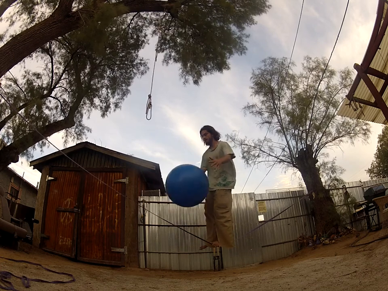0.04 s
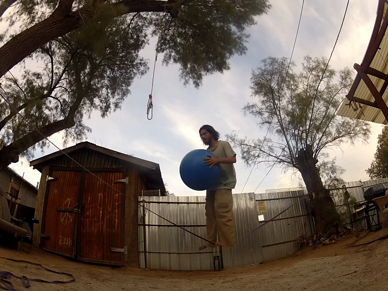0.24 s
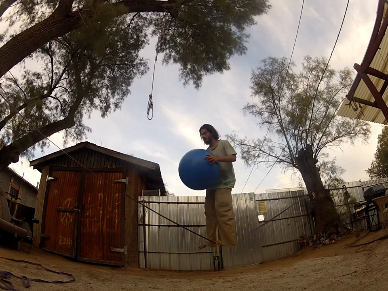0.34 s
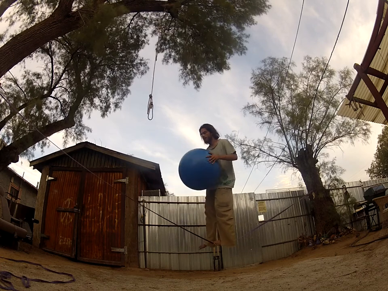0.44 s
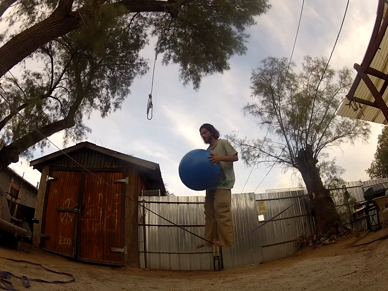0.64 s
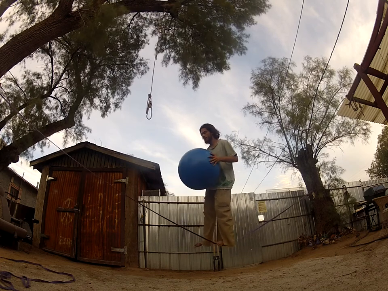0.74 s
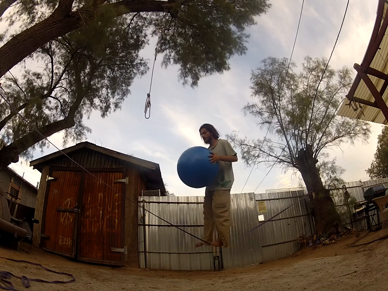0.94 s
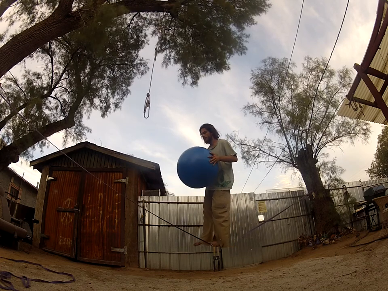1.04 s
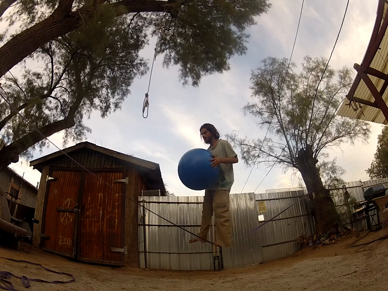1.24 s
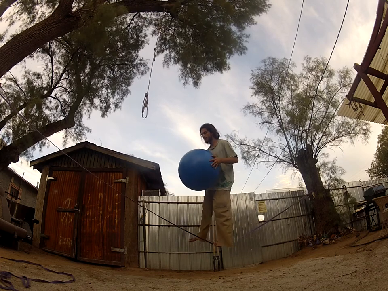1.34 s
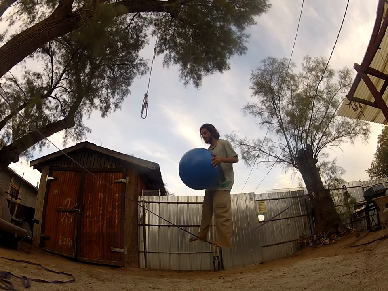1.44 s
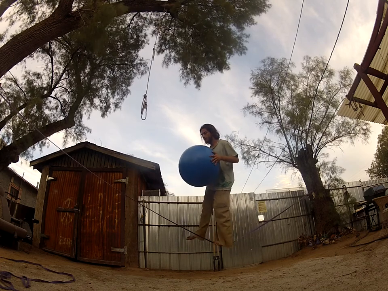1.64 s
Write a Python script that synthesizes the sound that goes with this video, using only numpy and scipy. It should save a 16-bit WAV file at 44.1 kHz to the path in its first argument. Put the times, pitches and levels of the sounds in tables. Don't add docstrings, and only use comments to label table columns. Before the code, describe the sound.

A large air-filled rubber ball is caught once. Faint wind rumble and a low puff of moving air open the scene; at about 0.21 s the palms hit with a deep, hollow thud, and finger slaps rattle within 0.02 s. The rubbery ring is muted by the grip near 0.28 s, diffuse yard reflections fade by about 0.8 s, and quiet wind buffeting continues on a coarse, cased microphone.

```python
import sys
import numpy as np
from scipy import signal
from scipy.fft import rfft, irfft
from scipy.io import wavfile
from scipy.ndimage import uniform_filter1d

SR = 44100
rng = np.random.default_rng(int(sys.argv[2]) if len(sys.argv) > 2 else 0)


def pcm_store(signal):
    levels = np.round(np.clip(np.atleast_2d(signal), -1, 1) * 32767)
    wavfile.write(sys.argv[1], SR, levels.astype(np.int16).T)


def volts_from_decibels(level):
    exponent = np.asarray(level, float) / 20
    return 10 ** exponent


N = 74970

# [f/Hz, density/dB]
SLAP_TINT = [(500, -33), (900, 5), (1400, 9), (2050, 9), (3500, 3), (5600, -7)]


def ball():
    # [t/s, level/dB, contact/s]
    palms = [
        (.2116, 0, .0016),
        (.2228, -15, .0016),
    ]
    # [f/Hz, level/dB, t60/s]
    ball_modes = [(134.7, -20, .6), (130, -4.5, .044), (198, -9.3, .072), (476, -28, .34),
                  (669, -9.3, .036), (730.5, -13, .14),
                  (66.4, -25.5, 0.69), (248, -37.5, 0.82), (297.6, -33.5, 1)]
    radiate_hz, grip_s, grip_t60_s = 167, .283, .13
    t = np.arange(N) / SR
    push = np.zeros(N)
    for start_s, level_db, contact_s in palms:
        pulse = np.sin(np.pi * np.clip((t - start_s) / contact_s, 0, 1))
        push += volts_from_decibels(level_db) * pulse * np.pi / (2 * contact_s * SR)
    ring = strike(ball_modes, push)
    radiated = signal.sosfilt(signal.butter(2, radiate_hz, "high", fs=SR, output="sos"), ring)
    return radiated * np.where(t < grip_s, 1, fade(grip_s, grip_t60_s))


def slaps():
    # [t/s, crack/dB, crack t60/s, snap/dB]
    fingers = [
        (.2115, -36, .02, -30),
        (.2138, -36, .03, -32),
        (.2195, -43, .05, -50),
        (.2262, -35, .007, -19),
        (.229, -40, .025, -40),
    ]
    # [f/Hz, level/dB, t60/s]
    skin_modes = [(860, 13, .03), (958, -6, .25), (1206, -12, .2), (1500, -2, .04), (1637, -12, .2),
                  (1862, -8, .15), (2063, 0, .17), (2141, -7, .15), (2300, -13, .25), (2793, -17, .3),
                  (2935, -11, .15), (3520, -14, .1)]
    skin_db = -40
    ticks, first, crack_level = np.zeros((3, N))
    for start_s, crack_db, crack_t60_s, snap_db in fingers:
        ticks[int(start_s * SR)] = volts_from_decibels(snap_db)
        crack_level += volts_from_decibels(crack_db) * fade(start_s, crack_t60_s)
    first[int(fingers[0][0] * SR)] = volts_from_decibels(skin_db)
    snaps = strike([(3020, 0, .0011)], ticks)
    cracks = tinted(SLAP_TINT) * crack_level
    return snaps + cracks + strike(skin_modes, first)


def rush():
    # [t/s, level/dB]
    course = np.array([(0, -51), (.022, -39), (0.044, -42), (.075, -45.5), (.12, -56), (0.156, -59),
                       (.18, -35), (0.203, -36), (.225, -78)])
    # [f/Hz, density/dB]
    rush_tint = [(24, -34), (40, -0.5), (215, 1.5), (296, -9.5), (383, -17), (735, -19.5), (843, -23.5),
                 (1500, -36), (1950, -51), (3300, -120)]
    level_db = np.interp(np.arange(N) / SR, course[:, 0], course[:, 1])
    return tinted(rush_tint) * volts_from_decibels(level_db)


def yard():
    # [f/Hz, density/dB]
    thud_tint = [(40, -28), (70, -19), (150, 3.5), (290, -2.5), (390, -16), (480, -18.5), (750, -16.5),
                 (1100, -42)]
    # [f/Hz, density/dB]
    wash_tint = [(710, -21), (1200, 4), (2210, 2.5), (2570, -5), (2810, 1), (5600, -24), (7280, -56),
                 (12300, -120)]
    start_s, rise_s = .2003, .032
    thud_db, thud_t60_s = -27, .44
    crisp_db, crisp_t60_s = -42, .18
    late_db, late_t60_s = -50, .84
    rise = np.clip((np.arange(N) / SR - start_s) / rise_s, 0, 1)
    thud = tinted(thud_tint) * volts_from_decibels(thud_db) * fade(start_s, thud_t60_s)
    crisp = tinted(SLAP_TINT) * volts_from_decibels(crisp_db) * fade(start_s, crisp_t60_s)
    late = tinted(wash_tint) * volts_from_decibels(late_db) * fade(start_s, late_t60_s)
    return rise * (thud + crisp + late)


def wind():
    # [f/Hz, density/dB]
    wind_tint = [(15, -18), (25, -44), (44, -2), (146, -1), (225, -7), (667, -15), (895, -23),
                 (1170, -25.5), (5600, -45), (7280, -46), (12300, -120)]
    level_db, split_hz = -49, 250
    air = tinted(wind_tint)
    low = signal.sosfiltfilt(signal.butter(2, split_hz, fs=SR, output="sos"), air)
    buffets = low * volts_from_decibels(1.5 * walk(40))
    hiss = (air - low) * volts_from_decibels(.4 * walk(20))
    return volts_from_decibels(level_db) * (buffets + hiss)


def strike(modes, hits):
    t = np.arange(N // 2) / SR
    ring = np.zeros(N // 2)
    for hz, level_db, t60_s in modes:
        ring += volts_from_decibels(level_db) * fade(0, t60_s)[:N // 2] * np.sin(2 * np.pi * hz * t)
    return signal.fftconvolve(hits, ring)[:N]


def tinted(points):
    f = np.fft.rfftfreq(N, 1 / SR) + 1
    p = np.array(points)
    gain = volts_from_decibels(np.interp(np.log(f), np.log(p[:, 0]), p[:, 1]))
    x = irfft(rfft(rng.standard_normal(N)) * gain, N)
    return x / x.std()


def fade(start_s, t60_s):
    t = np.arange(N) / SR - start_s
    return (t >= 0) * volts_from_decibels(-60 * np.maximum(t, 0) / t60_s)


def walk(rate_hz):
    k = int(SR / rate_hz)
    held = np.repeat(rng.standard_normal(N // k + 1), k)
    return uniform_filter1d(uniform_filter1d(held, k), k)[:N]


def scene():
    return (ball() + slaps() + rush() + yard() + wind())[None]


def top_cut(x):
    return signal.sosfilt(signal.butter(12, 16160, fs=SR, output="sos"), x)


def record(dry):
    step_hz = 12000
    edge_hz, edge_width_hz = 5710, 290
    top_hz, top_width_hz = 15200, 150
    f = np.fft.rfftfreq(N, 1 / SR)

    def soft(hz, width_hz):
        return 1 / (1 + np.exp(np.clip((f - hz) / width_hz * 2, -50, 50)))

    hold_droop = np.sinc(np.minimum(f / step_hz, .5))
    band = irfft(rfft(dry) * soft(edge_hz, edge_width_hz) / hold_droop, N)
    combed = band * (1 + 2 * np.cos(2 * np.pi * step_hz * np.arange(N) / SR))
    held = irfft(rfft(combed) * np.sinc(f / step_hz) * soft(top_hz, top_width_hz), N)
    return top_cut(held)


dry = scene()
out = record(dry)
pcm_store(out)
```